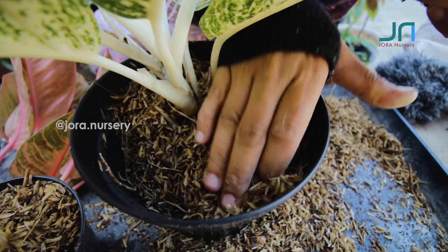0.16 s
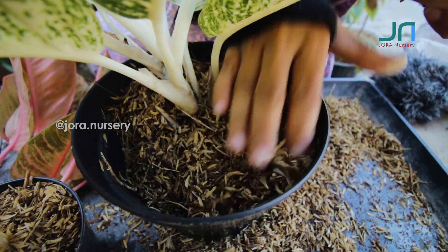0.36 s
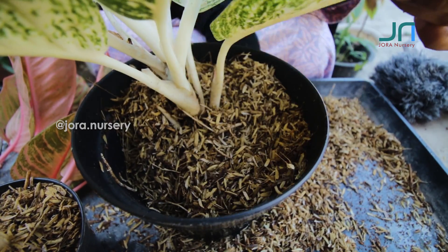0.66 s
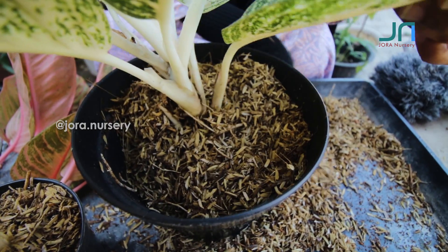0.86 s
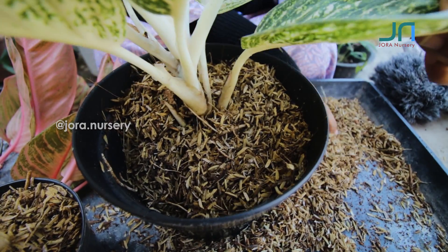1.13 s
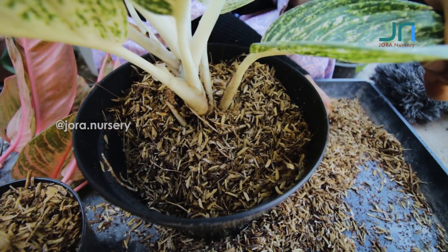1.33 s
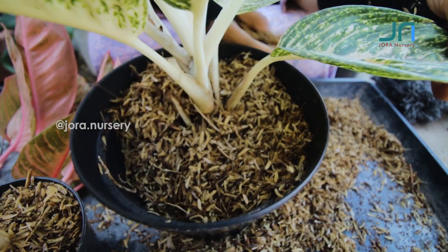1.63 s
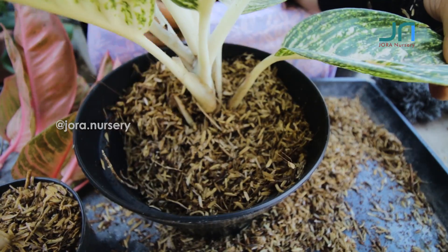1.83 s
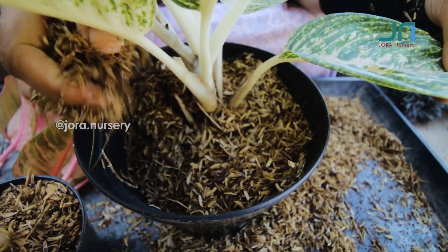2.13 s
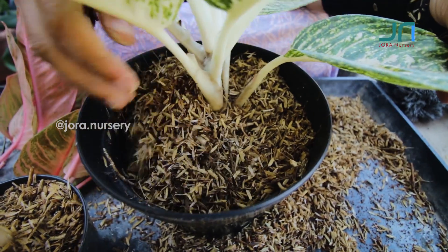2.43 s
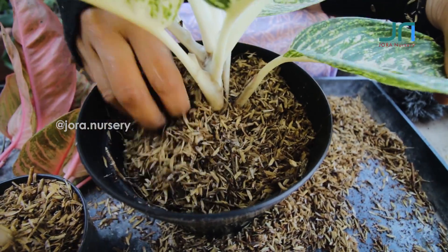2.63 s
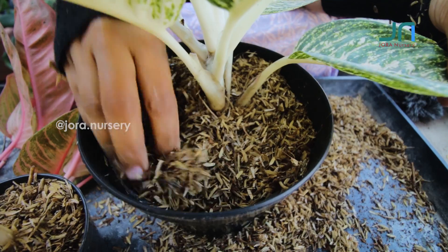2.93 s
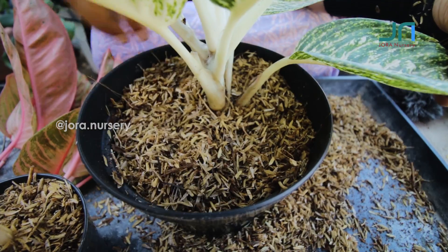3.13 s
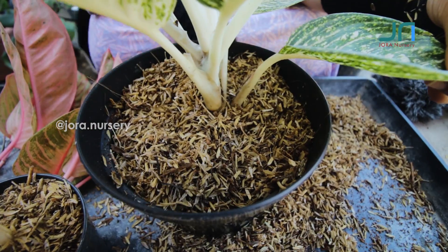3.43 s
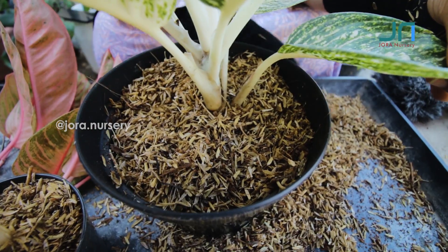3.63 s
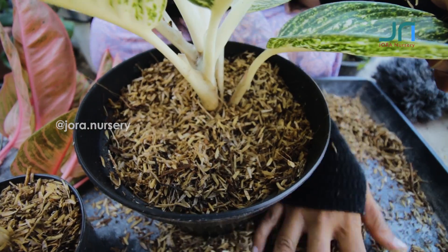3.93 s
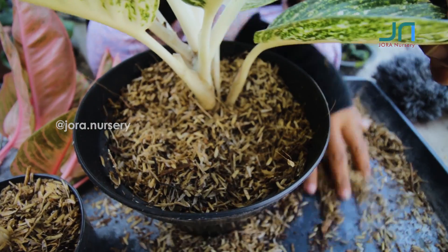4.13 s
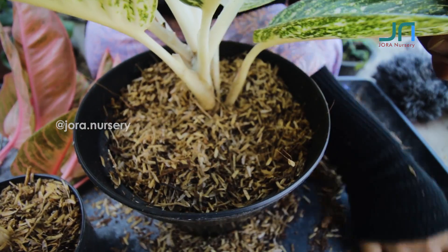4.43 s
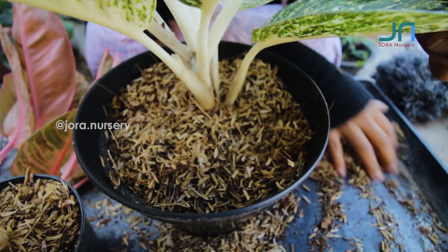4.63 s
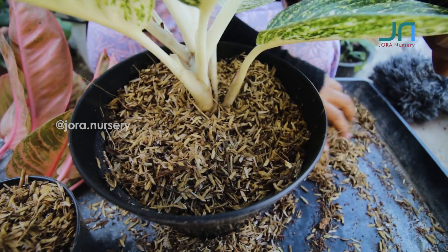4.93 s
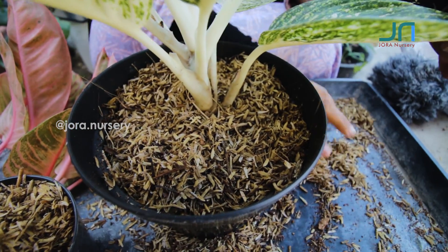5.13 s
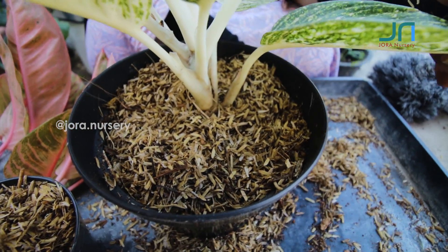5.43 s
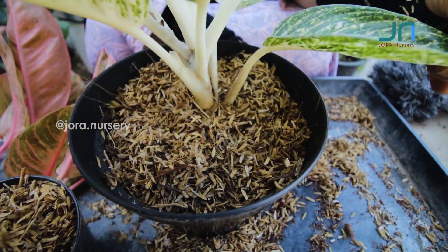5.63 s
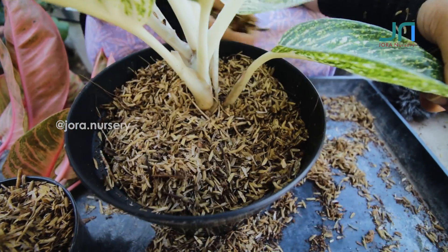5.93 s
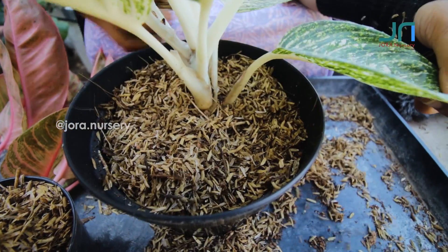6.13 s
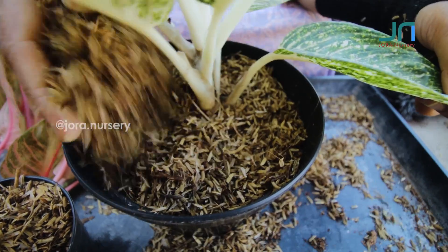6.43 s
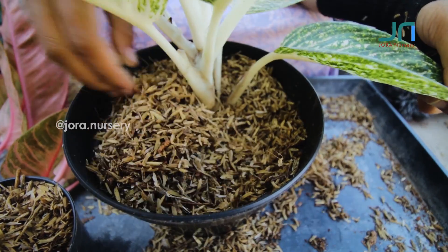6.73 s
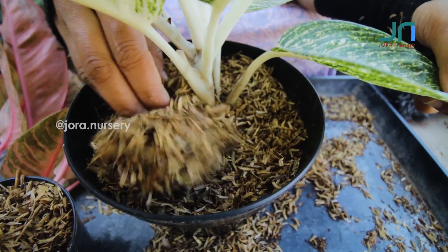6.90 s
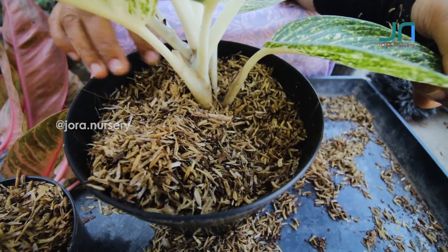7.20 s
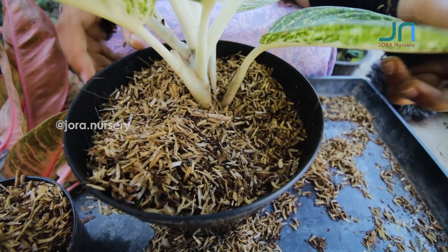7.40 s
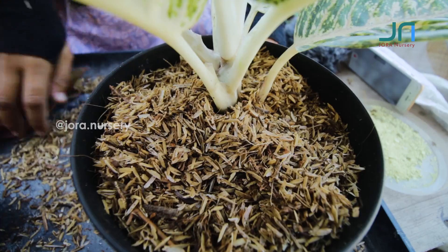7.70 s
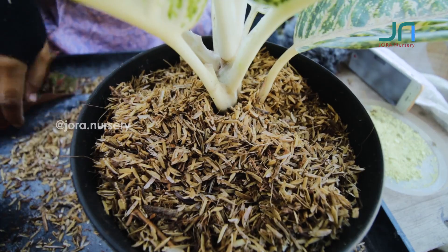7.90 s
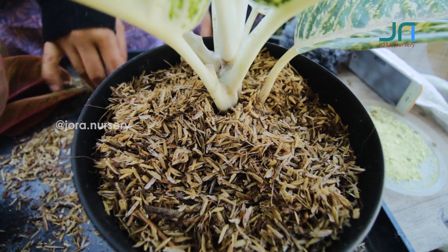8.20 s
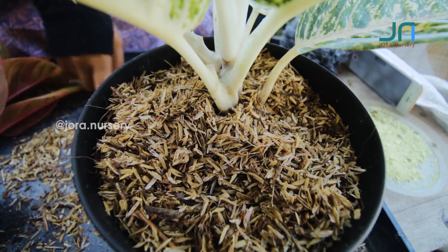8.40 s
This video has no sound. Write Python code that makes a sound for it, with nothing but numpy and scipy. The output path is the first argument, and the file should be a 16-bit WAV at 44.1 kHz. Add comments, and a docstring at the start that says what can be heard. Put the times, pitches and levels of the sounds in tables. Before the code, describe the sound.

Close up outdoors, a hand sweeps dry husks over a plastic tray in crunchy rasping strokes with knocks, then drops handfuls into a pot.

```python
"""Outdoors, close to the microphone: hands sweep dry husks over a plastic tray, scoop and drop them in a pot.
Husk grains are swarms of short clicks over soft noise; noise pushes the tray's modes into rattle and boom.
Fingers knock the tray, ringing the same modes; single husks tick as short coloured noise bursts.
Wind noise buffets the microphone. Farther off are a faint hum, a low drone with engine tones
that fade out, and one short thin whistle."""
import sys
import numpy as np
from scipy import signal
from scipy.fft import rfft, irfft, next_fast_len
from scipy.io import wavfile
from scipy.ndimage import uniform_filter1d

SR = 44100
rng = np.random.default_rng(int(sys.argv[2]) if len(sys.argv) > 2 else 0)


def unload_audio(sound):
    """Save the sound as a 16-bit wav file, at the path given as the first command line argument."""
    columns = np.transpose(np.atleast_2d(sound))
    # keep every value between -1 and 1, then stretch to whole-number steps
    steps = np.round(np.clip(columns, -1, 1) * 32767)
    wavfile.write(sys.argv[1], SR, steps.astype(np.int16))


N = 377496
T = np.arange(N) / SR
SPLIT_HZ = 5500  # between the body and the treble of the husks
EDGE_HZ = 15720  # upper band limit of the recorder


def amp(db):
    """Amplitude factor of a level in dB."""
    return 10 ** (np.asarray(db) / 20)


def evened(x):
    """Scales x to rms 1."""
    return x / np.sqrt(np.mean(x ** 2) + 1e-20)


def curves(rows):
    """Joins the rows of a table by straight lines in time, one curve per column after the first."""
    s, *columns = np.transpose(rows)
    return [np.interp(T, s, column) for column in columns]


def coloured(x, points):
    """Filters x by a gain drawn through (pitch_hz, level_db) points on a log pitch axis."""
    f, db = np.transpose(points)
    size = next_fast_len(len(x))
    hz = np.fft.rfftfreq(size, 1 / SR)
    gain = amp(np.interp(np.log(hz + 0.069), np.log(f + 0.15), db))
    return irfft(rfft(x, size) * gain, size)[:len(x)]


def coloured_noise(points):
    """Steady random noise of rms 1 with the spectrum of the points."""
    return evened(coloured(rng.standard_normal(N), points))


def split(x):
    """Parts of x below and above the split."""
    filters = [signal.butter(4, SPLIT_HZ, kind, fs=SR, output="sos") for kind in ("low", "high")]
    return [signal.sosfilt(sos, x) for sos in filters]


def wander(hz):
    """Slow chance of rms 1: noise through two equal one-pole lowpasses."""
    pole = [1, -np.exp(-2 * np.pi * hz / SR)]
    once = signal.lfilter([1], pole, rng.standard_normal(N))
    return evened(signal.lfilter([1], pole, once))


def add(mix, s, sound):
    """Adds a sound into the mix from second s, cut at the end of the mix."""
    part = mix[round(s * SR):][:len(sound)]
    part += sound[:len(part)]


# Colour of firmly swept husks, used for single ticks too: pitch_hz, level_db (per Hz)
SWEPT_COLOUR = [(350, -6), (600, 1.5), (698, -20.5), (931, -8), (1240, -6.5), (1570, -3), (1800, 3.5),
                (2870, -3), (4980, -10), (6370, -11.5), (8270, -4), (10300, -10.5), (13900, -7.5),
                (16000, -11.5)]
# Colour of loose husks falling: pitch_hz, level_db (per Hz)
PATTER_COLOUR = [(350, -25), (600, -2.5), (919, -3), (2090, -6), (2570, -10.5), (3080, -11), (4280, -15),
                 (8990, -6.5), (10500, -9.5), (13600, -13), (16000, -3)]


def husks():
    """A firm sweep moves husks as a dense hiss; a light touch lets them patter one by one."""
    gains = stirred()
    firm = 1 / (1 + (gains[0] / amp(-49.5)) ** -1.3)  # 0 light, 1 firm, by the crunch level
    sweep = swarm(9000, spread_db=1.5, clump_db=2.0, ring_s=0.0078, snap=0.38, soft=0.71,
                  patch_db=2.0, colour=SWEPT_COLOUR)
    patter = swarm(700, spread_db=5.0, clump_db=3.0, ring_s=0.0017, snap=0.17, soft=1.95,
                   patch_db=2.5, colour=PATTER_COLOUR)
    crunch, hiss = (np.sqrt(firm) * a + np.sqrt(1 - firm) * b for a, b in zip(sweep, patter))
    rattle = dragged(TRAY_MODES[2:], uneven_db=3.5, hardness_db=0.0)
    boom = dragged(TRAY_MODES[:2], uneven_db=2.5, hardness_db=-6.0)
    return (gains * [crunch, hiss, rattle, boom]).sum(0)


def swarm(per_s, spread_db, clump_db, ring_s, snap, soft, patch_db, colour):
    """Random clicks of uneven size in clumps; each kind of husk rattles briefly around its own pitch."""
    t, out = T[:600], np.zeros(N)
    chance = np.clip(per_s / SR, 1e-4, 1)
    size = amp(spread_db * np.minimum(rng.exponential(1, N), 5)) * rng.choice([-1., 1.], N)
    clicks = size * (rng.random(N) < chance)
    kind = rng.integers(0, 14, N)
    for k, hz in enumerate(np.geomspace(800, 15000, 14)):
        ring = hz / 3000 * np.sin(2 * np.pi * hz * t) * np.exp(-t * hz / 1.75)
        rattle = snap * rng.standard_normal(len(t)) * np.exp(-t / ring_s)
        out += signal.oaconvolve(clicks * (kind == k), ring + rattle)[:N]
    out = evened(out) + soft * rng.standard_normal(N)  # countless small grains blur into rustle
    # flatten the broad spectrum, so that the colour alone sets it
    spectrum = rfft(out * amp(clump_db * wander(35)))
    flat = irfft(spectrum / np.sqrt(uniform_filter1d(abs(spectrum) ** 2, 6000)), N)
    return [evened(part) for part in split(coloured(patchy(flat, patch_db), colour))]


def patchy(x, patch_db):
    """Random patches of pitch and time swell and sink as different clumps of husks move."""
    z = signal.stft(x, nperseg=256)[2]
    across_pitch = uniform_filter1d(rng.standard_normal(z.shape), size=7, axis=0)
    patches = uniform_filter1d(across_pitch, size=14, axis=1)
    return evened(signal.istft(z * amp(patch_db * evened(patches)), nperseg=256)[1][:N])


# Loose husks trickling between strokes: start_s, crunch_db, hiss_db (against the crunch),
# rattle_db (tray), boom_db (tray)
TRICKLE = [(0.0, -51.5, -6.5, -50, -56), (0.4, -63, -10, -62.5, -57), (0.47, -64, -15, -60.5, -59.5),
           (1.6, -64.5, -2.5, -62.5, -54.5), (1.95, -66, -3.5, -64, -68), (2.25, -61, -3, -62, -58),
           (2.55, -63, -6, -65.5, -64), (2.9, -64, -2, -67.5, -61), (3.45, -68, -11, -70, -71),
           (3.75, -66, 2, -63, -57.5), (3.93, -67, -5, -70, -73), (4.4, -65.5, -3, -64, -64),
           (4.85, -63, 1, -63, -63), (5.25, -62, -9, -62.5, -62), (5.75, -58, 0, -55, -54),
           (6.05, -57.5, -2, -52.5, -48), (6.7, -58, -7.5, -61.5, -49), (6.95, -60.5, -4.5, -64.5, -61.5),
           (7.3, -63, -10, -67.5, -56), (7.62, -62, -2, -68, -63), (7.77, -55.5, -14, -61.5, -61),
           (8.37, -60, -6, -58.5, -60), (8.47, -54, -11, -68, -56), (8.56, -48, -8, -51, -50.5)]
# Strokes of the hand through the husks: start_s (landing), swell_s, length_s, crunch_db (at the peak),
# landing_db (against the peak), sag_db (before the lift), hiss_db (against the crunch),
# rattle_db (tray), boom_db (tray), thump_db (landing)
STROKES = [(0.046, 0.076, 0.064, -50, -9, -7, -13, -46, -54, -51),
           (0.255, 0.026, 0.19, -55, -5, -10, -7, -56, -58, -58),
           (0.781, .12, 0.24, -43, -21, -12, -2, -46.5, -43.5, -52),
           (1.121, 0.12, .36, -42, -12.5, -12.5, -1.5, -43.5, -45, -33.5),
           (1.68, 0.29, 0.14, -54.5, -7.5, -9.5, -8, -55, -50, -59),
           (2.175, 0.027, 0.052, -62, -8, -11, -15, -58, -59, -68),
           (2.275, 0.019, .06, -66, -3, -5, -6, -56, -66, -67),
           (2.593, 0.015, .1, -55.5, -1, -10, -17, -56, -53, -56),
           (2.96, 0.081, 0.058, -54.5, -11, -9, -16, -66, -62, -62),
           (3.486, 0.065, .2, -39.5, -18.5, -14, -8.5, -40.5, -38, -35.5),
           (3.972, 0.05, 0.11, -51, -9, -4, -5, -49, -57, -56),
           (4.065, 0.13, 0.17, -35, -9, -8, -7.5, -46.5, -67, -43),
           (4.46, 0.18, 0.28, -34, -23.5, -1.5, -5, -42, -51, -39.5),
           (4.884, .17, 0.28, -43.5, -21, -14, 0.5, -44.5, -40.5, -37),
           (5.315, 0.11, 0.37, -43.5, -3.5, -12, -3.5, -44, -47.5, -33.5),
           (6.585, .04, .11, -63, -1, -4, -3, -78, -48, -60),
           (6.807, 0.087, 0.087, -55, -7, -14, -21, -57.5, -57, -60),
           (7.31, .04, 0.076, -56, -11, -9, -16, -61, -52.5, -60),
           (7.441, .07, 0.13, -57.5, -2, -7, -16, -68, -55.5, -62),
           (7.785, 0.084, 0.27, -50, -6, 2, -5, -53.5, -58, -60),
           (8.064, 0.15, .18, -36.5, -11, -11, -8, -36, -50, -51),
           (8.49, 0.0097, 0.052, -40.5, -8, -9, -9.5, -32, -44, -37)]


def stirred():
    """Gains of crunch, hiss, rattle and boom: the powers of the trickle and every stroke add up."""
    crunch_db, hiss_db, rattle_db, boom_db = curves(TRICKLE)
    power = amp([crunch_db, crunch_db + hiss_db, rattle_db, boom_db]) ** 2
    for row in STROKES:
        for layer, part in zip(power, stroke(*row)):
            add(layer, row[0], part)
    return np.sqrt(power)


TOUCH_S, LIFT_DB_PER_S = 0.0092, -260  # the hand comes down abruptly and lifts off quickly
HISS_DB_PER_S, RATTLE_DB_PER_S, BOOM_DB_PER_S = 3, -9, -11  # along a stroke the hiss gains, the tray calms
THUMP_RISE_S, THUMP_DB_PER_S = 0.045, -230


def stroke(start, swell, length, peak_db, landing_db, sag_db, hiss_db, rattle_db, boom_db, thump_db):
    """Power of crunch, hiss, rattle and boom: land, swell, sag, lift off; the landing thumps the tray."""
    t = T[:SR]
    rise = np.maximum(1 - t / swell, 0)
    sag = np.clip((t - swell) / max(length - swell, .005), 0, 1)
    lift_db = LIFT_DB_PER_S * np.maximum(t - length, 0)
    shape_db = landing_db * rise ** 2 + sag_db * sag ** 2 + lift_db
    along = t - swell
    layers_db = [peak_db + 0 * t,
                 peak_db + hiss_db + HISS_DB_PER_S * along,
                 rattle_db + RATTLE_DB_PER_S * along,
                 boom_db + BOOM_DB_PER_S * along]
    power = (amp(shape_db + layers_db) * np.minimum(t / TOUCH_S, 1)) ** 2
    thump_fall_db = THUMP_DB_PER_S * np.maximum(t - THUMP_RISE_S, 0)
    thump = amp(thump_db + thump_fall_db) * np.minimum(t / THUMP_RISE_S, 1)
    return power + np.outer([0, 0, 0, 1], thump ** 2)  # the thump goes to the boom only


# Resonances of the plastic tray; the first two boom, the rest rattle: pitch_hz, level_db, t60_s
TRAY_MODES = [(81.7, -2, 0.11), (108, -10, 0.052), (186.4, -3.5, 0.06), (220.6, -1, 0.043),
              (284, 1.5, 0.038), (344, -1.5, 0.037), (419.2, 0.5, 0.032), (494, -6, 0.044),
              (588, -18, 0.043), (860, -53, 0.021)]


def tray_ring(hardness_db=0, modes=TRAY_MODES):
    """The tray's modes after one blow, peak 1; a harder blow (dB per octave) favours the upper ones."""
    t = T[:8000]
    ring = 0
    for hz, db, t60 in modes:
        level_db = db + hardness_db * np.log2(hz / 250) - 60 * t / t60
        ring = ring + amp(level_db) * np.sin(2 * np.pi * hz * t)
    return ring / abs(ring).max()


def softened(ring):
    """Ramps a tray ring in over 1.3 ms, as a yielding contact starts it."""
    return ring * np.minimum(T[:8000] / 0.0013, 1)


def dragged(modes, uneven_db, hardness_db):
    """An uneven push keeps some of the tray's modes going."""
    push = rng.standard_normal(N) * amp(uneven_db * wander(29.0))
    return evened(signal.oaconvolve(push, softened(tray_ring(hardness_db, modes)))[:N])


CRACK_DB, CRACK_S = -20, .00016  # contact against the knock, and its time scale
# Fingers knocking the tray: start_s, level_db, hardness_db (per octave)
KNOCKS = [(0.094, -29.5, 14), (0.722, -24, -2.5), (1.125, -40, -10), (1.15, -24, -23), (1.179, -28, -28),
          (3.499, -31, -12), (3.528, -40, -14), (4.02, -31, -9.5), (4.069, -37, -7), (4.466, -30.5, 2),
          (4.505, -30, -12), (4.549, -21.5, -2), (4.89, -31.5, -16), (5.319, -18, -4.5), (5.346, -25.5, -7),
          (6.045, -50, -14), (6.198, -38, -8), (6.382, -27, 2), (6.448, -22, 3), (7.851, -34, 1),
          (8.041, -18.5, 8), (8.135, -24, 0), (8.17, -28, 19), (8.4922, -10.5, 2), (8.5012, -15, -3.5)]


def knocks():
    """Each knock rings the tray; the finger pad squashes briefly first, after a short crack of contact."""
    out, u = np.zeros(N), T[:400] / CRACK_S
    crack = u * (2 - u) * np.exp(1 - u)
    for s, db, hardness_db in KNOCKS:
        add(out, s + .0005, amp(db + CRACK_DB) * crack)
        add(out, s + 0.001, amp(db) * softened(tray_ring(hardness_db)))
    return out


TICK_T60_S = 0.02
# Single husks snapping: start_s, level_db (before a common 6 dB cut), treble_db (against the body)
TICKS = [(0.046, -35, -18), (0.0952, -25, -11), (0.333, -43, 5.5), (0.35, -58, 3), (0.399, -44, -4),
         (0.721, -29.5, -35), (0.7947, -35.5, -19), (0.8347, -30, -24), (0.8765, -28, -16),
         (1.1257, -36.5, -10), (1.154, -28.5, -16), (1.6243, -48.5, 3.5), (1.6955, -52, -20),
         (1.73, -42.5, 9), (1.809, -34.5, -11), (1.8853, -50, 6), (1.911, -48.5, 6), (2.016, -53.5, 6),
         (2.113, -41.5, -7), (2.2597, -45, -13), (2.2987, -46, -1), (2.5347, -42, -20),
         (2.5617, -39.5, -26), (2.603, -40, -18), (2.8727, -50.5, 7), (2.9647, -43, -23),
         (3.3032, -40.5, 0.5), (3.51, -35, -2), (3.7567, -41.5, -7), (4.0234, -37.5, -3),
         (4.333, -42.5, -7), (4.469, -32, -17), (4.51, -29, -19), (4.846, -38, -1), (4.9367, -48, 5),
         (5.3196, -45, -6), (5.8503, -43, -12), (6.048, -37, -1), (6.2027, -38.5, -8), (6.213, -36, -8),
         (6.2557, -49, -1), (6.6273, -38, -20), (6.64, -34, -4.5), (6.7255, -47, 2), (6.813, -50, 0),
         (6.692, -31, -11), (6.764, -44.5, 3), (6.8658, -39, -23), (6.9351, -45, -2.5), (6.981, -40, -9),
         (7.13, -40, -15), (7.1748, -39, -25), (7.202, -41.5, 4), (7.3292, -39, -9), (7.346, -34, -16),
         (7.3688, -37.5, -12), (7.6327, -46, 5), (8.005, -37, 4), (8.042, -33, -17), (8.0942, -33, -2),
         (8.159, -29, -29), (8.1865, -18.5, -36), (8.4453, -38, -9), (8.47, -30, -6), (8.493, -21.5, -11)]


def ticks():
    """A sharp noise burst with the colour of the husks, duller or brighter from husk to husk."""
    out, t = np.zeros(N), T[:3000]
    for s, db, treble_db in TICKS:
        low, high = split(coloured(rng.standard_normal(3000), SWEPT_COLOUR))
        low = coloured(low, [(2800, 0), (5500, min(treble_db + 11, 0))])  # dull husks lose upper body too
        burst = evened(low) + amp(treble_db) * evened(high)
        decay = amp(db - 6 - 60 * t / TICK_T60_S)
        add(out, s, decay * burst * np.minimum(t / .0004, 1))
    return out


# Wind at the microphone: start_s, slow_db (pressure), flutter_db
GUSTS = [(0.0, -41, -63.5), (0.16, -29.5, -40.5), (1.02, -40.5, -50), (1.14, -25, -45), (1.67, -50.5, -50),
         (1.93, -42, -38.5), (1.98, -29.5, -47), (2.86, -24.5, -44.5), (3.33, -38, -60.5), (4.86, -48, -50),
         (4.91, -28, -39), (5.27, -41.5, -55), (5.55, -19.5, -30), (5.72, -18.5, -52), (5.79, -28.5, -31.5),
         (6.51, -16, -27.5), (7.13, -34, -41), (7.25, -16.5, -36.5), (7.77, -58.5, -58.5), (8.56, -38, -55)]
# Colour of the slow pressure swings: pitch_hz, level_db (per Hz)
BREEZE_COLOUR = [(1, 15.5), (4, 22), (9, -3.5), (18, -5), (26, -10), (40, -55), (200, -140)]
# Colour of the flutter: pitch_hz, level_db (per Hz)
FLUTTER_COLOUR = [(12, -1), (22, 15), (35, -1), (60, -12), (100, -25.5), (200, -43), (800, -120)]


def breeze():
    """Slow pressure swings at the microphone, with a lumpy flutter on top."""
    slow_db, flutter_db = (uniform_filter1d(curve, size=5000) for curve in curves(GUSTS))
    slow = steady(coloured(rng.standard_normal(N), BREEZE_COLOUR), .18)
    flutter = steady(coloured(rng.standard_normal(N), FLUTTER_COLOUR), 0.26)
    return amp(slow_db) * slow + amp(flutter_db) * flutter


def steady(x, s):
    """Evens out the chance swells of x that are longer than s seconds."""
    return x / np.sqrt(uniform_filter1d(x ** 2, round(s * SR)) + 0.0013 * np.mean(x ** 2))


# A low far drone: start_s, level_db
DRONE = [(0.0, -58.5), (1.4, -54.5), (1.91, -66), (4.53, -65), (4.62, -70), (5.31, -65), (5.43, -50),
         (6.6, -70), (7.18, -70), (8.18, -53.5), (8.56, -56)]
# Colour of its noise: pitch_hz, level_db (per Hz)
DRONE_COLOUR = [(90, -36), (115, 4.5), (135, -5.5), (160, -1), (190, -15.5), (260, -53)]


def drone():
    """Low far noise and engine tones that rise and sink together."""
    noise = amp(-3) * coloured_noise(DRONE_COLOUR)
    return amp(curves(DRONE)[0]) * (noise + engine())


ENGINE_HZ = 32.45  # mean firing rate
ENGINE_GONE_S, ENGINE_FADE_S = 4.2, .5  # silent from here, after a fade of this length
# Audible multiples of the firing rate: multiple, level_db (against the drone)
ENGINE_TONES = [(4, -2), (5, -4.5), (10, -12), (11, -12), (12, -12.5), (13, -14.5)]


def engine():
    """A far engine idling: wavering multiples of a slightly unsteady firing rate, dying away."""
    turns = np.cumsum(ENGINE_HZ + .15 * wander(2.27)) / SR
    tones = np.zeros(N)
    for k, db in ENGINE_TONES:
        tones += amp(db + 2.7 * wander(4)) * np.sin(2 * np.pi * (k * turns + rng.random()))
    return tones * np.clip((ENGINE_GONE_S - T) / ENGINE_FADE_S, 0, 1)


# A thin far whistle: start_s, pitch_hz, level_db
WHISTLE = [(0.61, 5900, -79), (0.638, 6150, -66.5), (0.704, 6150, -73), (0.74, 6220, -67),
           (0.78, 6140, -87)]


def whistle():
    """One short far tone whose pitch and level waver."""
    hz, db = curves(WHISTLE)
    sounding = 1. * (T > WHISTLE[0][0]) * (T < WHISTLE[-1][0])
    on = uniform_filter1d(sounding, 500)  # soft edges
    tone = np.sin(2 * np.pi * np.cumsum(hz + 25 * wander(60)) / SR)
    return np.sqrt(2) * on * amp(db + 1.9 * wander(40)) * tone


HUM_DB = -65
# Colour of the surroundings: pitch_hz, level_db (per Hz)
HUM_COLOUR = [(24, -30), (40, 1.5), (71, -51), (372, -24), (491, -26), (556, -28.5), (1210, -30),
              (1550, -38), (2100, -42), (2380, -39), (13100, -52), (16000, -58)]


def hum():
    """Faint steady noise of the surroundings, mostly low."""
    return amp(HUM_DB) * coloured_noise(HUM_COLOUR)


def scene():
    """Husks, knocks and ticks near the microphone, the breeze on it and the far background."""
    near = husks() + knocks() + ticks()
    far = drone() + whistle() + hum()
    return (near + breeze() + far)[None]


def record(dry):
    """The band limit of the recorder: a steep lowpass."""
    lowpass = signal.firwin(1023, EDGE_HZ, window=("kaiser", 9), fs=SR)
    return signal.oaconvolve(dry, lowpass[None], "same")


dry = scene()
out = record(dry)
unload_audio(out)
```